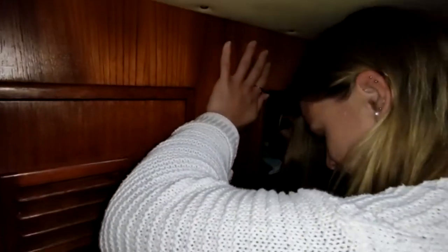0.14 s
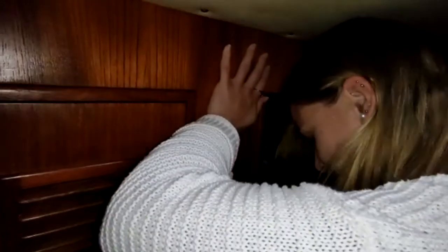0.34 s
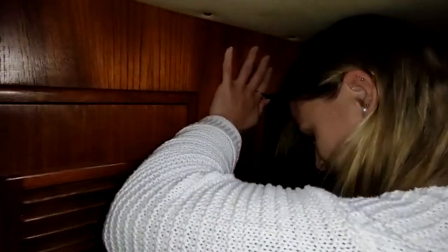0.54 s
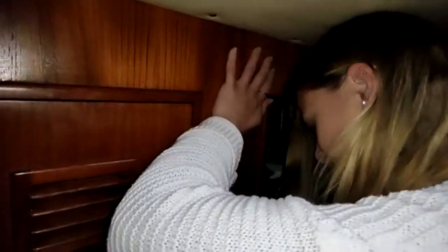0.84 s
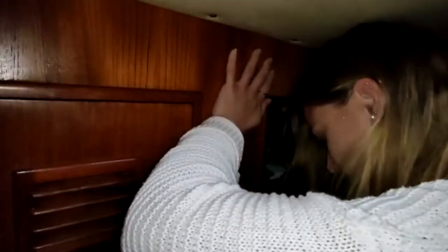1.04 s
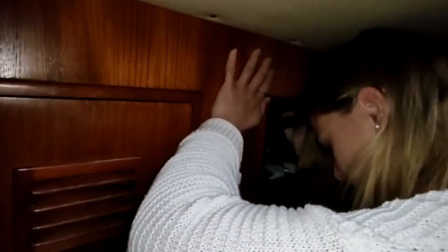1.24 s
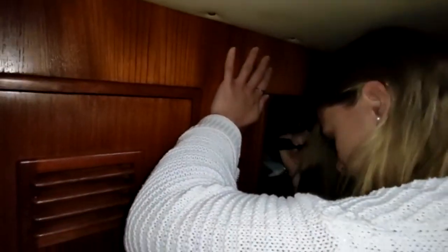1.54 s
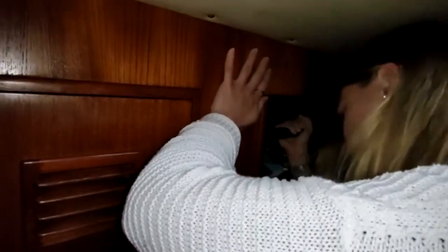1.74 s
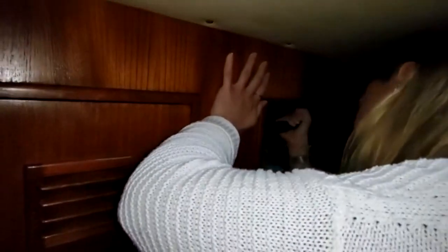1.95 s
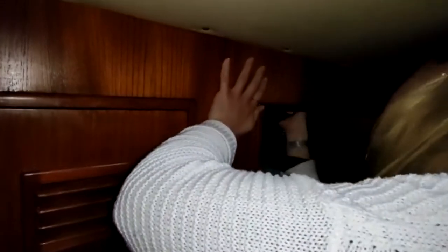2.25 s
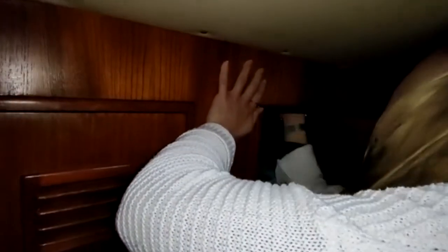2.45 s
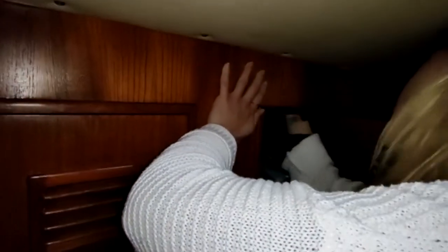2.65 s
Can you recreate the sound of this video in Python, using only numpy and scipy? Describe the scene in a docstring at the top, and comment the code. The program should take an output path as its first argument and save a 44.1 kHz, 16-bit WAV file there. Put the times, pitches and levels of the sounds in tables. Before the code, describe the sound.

Manual boat toilet pump worked in strokes, valves clacking, water glugging, ending in a loud gulp

```python
"""A small wooden boat cabin: a hand pump empties a toilet bowl.
Piston and valves clack and spit as noise bursts; the seal's squelches ring modes of the pump body.
The mounting booms and air pockets glug as decaying tones; water rushes through the hose as coloured
noise, with a climbing whistle as it fills. At the end the bowl gulps air, a tone with overtones."""
import sys
import numpy as np
from scipy import signal
from scipy.fft import rfft, irfft
from scipy.io import wavfile
from scipy.ndimage import uniform_filter1d

SR = 44100
rng = np.random.default_rng(int(sys.argv[2]) if len(sys.argv) > 2 else 0)


def log_audio(samples):
    """Write samples as a 16-bit WAV file to the path given in sys.argv[1]."""
    # one column per channel
    frames = np.atleast_2d(samples).T
    # limit to full scale, then quantise
    limited = np.clip(frames, -1, 1)
    pcm = np.round(limited * 32767).astype(np.int16)
    wavfile.write(sys.argv[1], SR, pcm)


def magnitude_from_level(level_db):
    """Linear magnitude for a level in decibels (20 dB per decade)."""
    exponent = np.asarray(level_db, float) / 20
    return 10 ** exponent


N = 123479

# water through the hose: (time [s], rush level [dB], gurgle level [dB], treble level [dB])
FLOW = [(0, -37.5, -36.5, -62), (0.25, -48.5, -43, -70), (0.78, -43, -40.5, -62), (0.96, -43.5, -44, -62),
        (1.12, -48.5, -48.5, -73), (1.36, -47.5, -47, -68), (1.62, -41, -38, -59),
        (1.88, -39.5, -42.5, -54.5), (2.08, -44, -48, -62), (2.28, -47.5, -48, -70),
        (2.42, -46, -41.5, -67), (2.52, -30, -27, -51.5), (2.8, -46.5, -37, -62)]
# likeness of the two sides: (frequency [Hz], correlation)
LIKENESS = [(60, 1), (240, 0.85), (950, 0.15), (15000, -0.066)]


def read(points, hz):
    """A table read on a log frequency axis."""
    f, value = np.transpose(points)
    return np.interp(np.log(hz + 1), np.log(f + 1), value)


def evened(x):
    """Scaled to rms 1."""
    return x / np.sqrt(np.mean(x ** 2) + 1e-20)


def add(mix, start_s, sound):
    """Mixes a sound in at start_s, cropped to the mix."""
    at = round(start_s * SR)
    sound = sound[..., max(-at, 0):]
    part = mix[..., max(at, 0):][..., :sound.shape[-1]]
    part += sound[..., :part.shape[-1]]


def pair_noise(size, gain_at):
    """Two-channel noise of the given colour, alike in the bass and nearly unrelated in the treble."""
    hz = np.fft.rfftfreq(size, 1 / SR)
    a, b = rfft(rng.standard_normal((2, size)))
    same = np.clip(read(LIKENESS, hz), -1, 1)
    right = same * a + np.sqrt(1 - same ** 2) * b
    return evened(irfft(np.array([a, right]) * gain_at(hz), size))


def burst(t, rise_s, hold_s, t60_s):
    """Linear rise, hold until hold_s after the start, exponential fall."""
    return np.minimum(t / rise_s, 1) * magnitude_from_level(-60 * np.maximum(t - hold_s, 0) / t60_s)


def gritty(length, grain_samples):
    """Uneven level of a rough contact, 3 dB rms."""
    return magnitude_from_level(3 * evened(uniform_filter1d(rng.standard_normal(length), size=grain_samples)))


def clacks():
    """Valve clacks and spits of water: gritty bursts of coloured noise."""
    # (time [s], level before trim [dB], hold [s], t60 [s], tilt [dB/octave])
    clack_rows = [(0.0014, -22.5, 0.011, 0.12, -1), (0.0582, -20, 0.011, 0.12, -2),
                  (0.072, -19, 0.032, 0.068, 0), (0.4302, -16, 0.011, 0.087, 1),
                  (0.8257, -23.5, 0.012, 0.087, 1), (0.836, -14.5, 0.0085, 0.12, 1),
                  (0.874, -21, 0.016, 0.13, 0.5), (0.984, -22.5, 0.021, 0.15, -1.5),
                  (1.0066, -20.5, 0.012, 0.11, -1.5), (1.14, -29.5, 0.0047, 0.089, 0),
                  (1.2068, -19, 0.0095, 0.12, 1.5), (1.4374, -17, 0.0075, 0.084, 0),
                  (2.1442, -20, 0.0073, 0.12, -1.5), (2.321, -23, 0.019, 0.067, 3),
                  (2.3373, -24, 0.012, 0.068, 6), (2.451, -28, 0.01, 0.1, 0.5),
                  (2.5863, -12, 0.0061, 0.12, 2), (2.6224, -18, 0.03, 0.14, -1),
                  (2.688, -20.5, 0.021, 0.18, -0.5)]
    # spectrum before tilt: (frequency [Hz], relative level per Hz [dB])
    clack_colour = [(88, -18), (150, -2), (582, -7.5), (1160, -14.5), (2260, -5), (3030, -12), (5250, -15),
                    (7330, -25), (15800, -40)]
    trim_db, rise_s = -8.5, 0.0021
    out, t = np.zeros((2, N)), np.arange(16384) / SR
    for s, db, hold_s, t60_s, tilt_db in clack_rows:
        def gain_at(hz):
            return magnitude_from_level(read(clack_colour, hz) + tilt_db * np.log2((hz + 50) / 2500))
        envelope = gritty(len(t), 60) * burst(t, rise_s, hold_s, t60_s)
        add(out, s, magnitude_from_level(db + trim_db) * envelope * pair_noise(len(t), gain_at))
    return out


def ringing(t, centre_hz):
    """The pump body's modes near centre_hz at uneven strength, over a scraping hiss."""
    # modes of the pump body: (frequency [Hz], relative level [dB])
    body_modes = [(340, 1), (430, -2), (523, -2), (619, 0), (676, 0), (865, -5), (960, 3), (1120, -2),
                  (1290, 0), (1680, -3), (1840, 0), (2100, 0), (2300, -1), (3060, -7)]
    falloff_db_per_octave2, hiss_db = -9, -10
    hz, db = np.transpose(body_modes)
    spread_db, phase_turns, skew = rng.standard_normal((3, len(body_modes)))

    def near(f):
        return magnitude_from_level(falloff_db_per_octave2 * np.log2((f + 1) / centre_hz) ** 2)

    # phase offset of the right side, wider where the sides are less alike
    lag_rad = np.arccos(np.clip(read(LIKENESS, hz), -1, 1)) * skew
    side_rad = np.array([0 * lag_rad, lag_rad])[:, None]
    detuned_hz = hz * (1 + .006 * skew)
    modes = np.sin(2 * np.pi * (detuned_hz * t[:, None] + phase_turns) + side_rad)
    flutter = evened(uniform_filter1d(rng.standard_normal(modes.shape[1:]), size=300, axis=0))
    modes = modes * (1 + 0.45 * flutter)
    hiss = pair_noise(len(t), lambda f: np.sqrt(near(f)))
    return evened(modes @ (magnitude_from_level(db + spread_db) * near(hz))) + magnitude_from_level(hiss_db) * hiss


def knocks():
    """Squelches and scrapes of the piston seal: gritty bursts that ring the pump body."""
    # (time [s], level before trim [dB], hold [s], region rung most [Hz])
    knock_rows = [(0.596, -27, 0.005, 1300), (0.84, -14, 0.024, 500), (0.874, -19, 0.036, 420),
                  (1.142, -28, 0.014, 1600), (1.247, -27, 0.014, 1200), (1.726, -19, 0.056, 2000),
                  (1.735, -23, 0.052, 600), (2.319, -17, 0.035, 1150), (2.336, -17, 0.022, 2300),
                  (2.487, -20, 0.03, 1050), (2.51, -18, 0.03, 950), (2.48, -25, 0.065, 2300),
                  (2.591, -12, 0.013, 640), (2.734, -18, 0.022, 950), (2.742, -22, 0.015, 1850)]
    trim_db, rise_s, t60_s = -11, 0.0035, 0.1
    out, t = np.zeros((2, N)), np.arange(16384) / SR
    for s, db, hold_s, centre_hz in knock_rows:
        envelope = gritty(len(t), 160) * burst(t, rise_s, hold_s, t60_s)
        add(out, s, magnitude_from_level(db + trim_db) * envelope * ringing(t, centre_hz))
    return out


def direct(hits):
    """Left side gains a late share of the right-minus-left difference above 700 Hz."""
    share, lag_s = 0.31, .00052
    difference = np.roll(hits[1] - hits[0], round(lag_s * SR))
    late = signal.lfilter(*signal.butter(2, 700, "high", fs=SR), difference)
    return np.array([hits[0] + share * late, hits[1]])


def tones(rows):
    """Tones that swell, peak 8 ms after the listed time and die away on a wandering pitch."""
    waver = 0.024  # rms, as a share of the pitch
    out = np.zeros(N)
    for s, db, hz, rise_s, t60_s, *overtones_db in rows:
        t = np.arange(-rise_s, .5, 1 / SR)
        wander = evened(uniform_filter1d(rng.standard_normal(30000), size=900))[:len(t)]
        swell = np.sin(np.pi / 2 * np.clip(t / rise_s + 1, 0, 1)) ** 3
        fade = magnitude_from_level(db - 60 * np.maximum(t, 0) / t60_s)
        phase_rad = 2 * np.pi * np.cumsum(hz * (1 + waver * wander)) / SR
        buzz = sum(magnitude_from_level(b) * np.sin(k * phase_rad) / np.sqrt(k) for b in overtones_db for k in range(2, 14))
        add(out, s + .008 - rise_s, swell * fade * (np.sin(phase_rad) + buzz))
    return out


def booms():
    """Booms of the mounting panel, decaying tones around one pitch."""
    # (time [s], peak level [dB], t60 [s])
    boom_rows = [(0.118, -28.5, 0.18), (0.188, -31, 0.86), (0.269, -29, 0.4), (0.443, -26, 0.51),
                 (0.579, -26, 0.59), (0.662, -26, 0.22), (0.77, -24, 0.14), (0.842, -25, 0.12),
                 (1.004, -22, 0.23), (1.212, -26.5, 0.49), (1.402, -25.5, 0.14), (1.457, -24, 0.17),
                 (1.565, -26, 0.34), (1.739, -27, 0.12), (2.153, -25, 0.29), (2.468, -23, 0.21),
                 (2.574, -13, 0.24), (2.718, -22.5, 0.12)]
    panel_hz, rise_s = 107.73, 0.02146
    return tones([(s, db, panel_hz, rise_s, t60_s) for s, db, t60_s in boom_rows])


def thuds():
    """Low thuds of the panel, each a decaying tone at its own pitch."""
    # (time [s], peak level [dB], frequency [Hz], t60 [s])
    thud_rows = [(0.045, -23, 88, 0.095), (0.964, -26, 69.5, 0.15), (1.682, -28.5, 91.6, 0.36),
                 (2.532, -14, 90, 0.13)]
    rise_s = 0.0119
    return tones([(s, db, hz, rise_s, t60_s) for s, db, hz, t60_s in thud_rows])


def glugs():
    """Air pockets in the hose, each a decaying resonance."""
    # (time [s], peak level [dB], frequency [Hz], t60 [s])
    glug_rows = [(0.04, -22, 390, 0.15), (0.517, -27.5, 242, 0.073), (0.571, -29, 243, 0.25),
                 (0.636, -32, 450, 0.1), (0.88, -24, 255, 0.13), (1.383, -27, 177, 0.13),
                 (1.548, -25.5, 177, 0.13), (1.702, -20, 396.4, 0.14), (2.32, -18.5, 346, 0.11),
                 (2.386, -23, 428, 0.22), (2.524, -8.5, 269.4, 0.11), (2.579, -16, 269.3, 0.11),
                 (2.633, -21, 482.3, 0.19), (2.731, -21.5, 193, 0.11)]
    rise_s = 0.0119
    return tones([(s, db, hz, rise_s, t60_s) for s, db, hz, t60_s in glug_rows])


def gulp():
    """The bowl runs dry and gulps air: a tone with a row of overtones."""
    # (time [s], fundamental peak [dB], frequency [Hz], rise [s], t60 [s], overtones before 1/sqrt(k) [dB])
    gulp_row = (2.496, -5, 347, .04, 0.105, -25)
    return tones([gulp_row])


def bubbles():
    """Random small bubbles, short tones whose strength follows the gurgle."""
    per_s, low_hz, high_hz, rise_s, t60_s = 30, 168.8, 480, 0.0119, 0.063
    place, pitch, size = rng.random((round(per_s * N / SR), 3)).T
    s = place * N / SR
    flow_s, _, gurgle_db, _ = np.transpose(FLOW)
    db = np.interp(s, flow_s, gurgle_db) - 1 + 6 * size
    hz = low_hz * (high_hz / low_hz) ** (pitch ** 2)
    return tones([(*row, rise_s, t60_s) for row in zip(s, db, hz)])


def water():
    """Turbulent rush, gurgle, fizz and rumble: coloured noise in drifting patches and flicker."""
    # spectra: (frequency [Hz], relative level per Hz [dB])
    rush_colour = [(410, -10.5), (700, -0.5), (1100, -2), (2420, -1), (2980, -11), (5040, -15), (7500, -25),
                   (9750, -57)]
    gurgle_colour = [(35, -31), (60, -4.5), (124, -3.5), (172, -7), (263, -2), (715, -10), (1820, -60)]
    fizz_colour = [(3820, -34), (6500, -4.5), (15100, 0), (16200, -9)]
    rumble_colour = [(8.8, -41), (15, -12), (70, -5.5), (90, -11), (120, 3), (200, -120)]
    patchy_db, flicker_db = 2.5, 1.5  # rms
    t = np.arange(N) / SR
    flow_s, rush_db, gurgle_db, fizz_db = np.transpose(FLOW)
    rumble_db = -45 + 0.88 * (gurgle_db + 46)
    layers = [(rush_db, rush_colour), (gurgle_db, gurgle_colour),
              (fizz_db, fizz_colour), (rumble_db, rumble_colour)]
    mix = np.zeros((2, N))
    for db, colour in layers:
        noise = pair_noise(2 ** 17, lambda hz: magnitude_from_level(read(colour, hz)))[:, :N]
        mix += magnitude_from_level(np.interp(t, flow_s, db)) * noise
    z = signal.stft(mix, nperseg=512, noverlap=384)[2]
    patches = uniform_filter1d(rng.standard_normal(z.shape[1:]), size=5, axis=0)  # across frequency
    patches = uniform_filter1d(patches, size=12, axis=1)  # along time
    flicker = uniform_filter1d(rng.standard_normal(z.shape[2]), size=3)
    z = z * magnitude_from_level(patchy_db * evened(patches) + flicker_db * evened(flicker))
    return signal.istft(z, nperseg=512, noverlap=384)[1][:, :N]


def filling():
    """A fuzzy whistle that climbs as the air space in the filling hose shrinks."""
    # (time [s], frequency [Hz], level [dB])
    whistle_path = [(1.55, 247.3, -40), (1.61, 480, -50.5), (1.65, 707, -46), (1.689, 857, -47)]
    bandwidth_hz = 140
    s, hz, db = np.transpose(whistle_path)
    t, r = np.arange(N) / SR, np.exp(-np.pi * bandwidth_hz / SR)
    fuzz = signal.lfilter([1], [1, -2 * r, r * r], rng.standard_normal((2, N)))
    phase_rad = 2 * np.pi * np.cumsum(np.interp(t, s, hz)) / SR
    whistle = evened(fuzz[0] * np.cos(phase_rad) + fuzz[1] * np.sin(phase_rad))
    return magnitude_from_level(np.interp(t, s, db, -120, -120)) * whistle


def cabin(x):
    """Short decaying tail of the wooden cabin: sparse random echoes, other taps for each side."""
    t60_s, tail_db, taps_per_s, gap_s = 0.073, -13.5, 3000, .003
    t = np.arange(SR // 2) / SR
    signs = rng.choice([-1., 1.], (2, len(t)))
    present = rng.random((2, len(t))) < taps_per_s / SR
    taps = signs * present * magnitude_from_level(-60 * t / t60_s) * (t > gap_s)
    return magnitude_from_level(tail_db) * signal.fftconvolve(x, taps / np.linalg.norm(taps[0]), axes=1)[:, :N]


def scene():
    """Pump, panel and water in the cabin; the tail follows the clacks and knocks only."""
    hits = direct(clacks() + knocks())
    panel = booms() + thuds()
    air = glugs() + gulp() + bubbles()
    return hits + cabin(hits) + panel + air + water() + filling()


def roll_off(x):
    """The treble ends steeply here."""
    return signal.sosfilt(signal.butter(12, 16560, fs=SR, output="sos"), x)


def record(dry):
    """Stereo pickup: the left microphone hears more of the upper mids."""
    # (frequency [Hz], left minus right [dB])
    lean_curve = [(60, 0.5), (180, -2), (550, -0.5), (2000, 8.5), (4970, 1), (15000, -3.5)]
    size = 2 ** 17
    lean = magnitude_from_level(read(lean_curve, np.fft.rfftfreq(size, 1 / SR)) / 2)  # half to each side
    finished = irfft(rfft(dry, size) * np.array([lean, 1 / lean]), size)[:, :N]
    return roll_off(finished)


dry = scene()
out = record(dry)
log_audio(out)
```